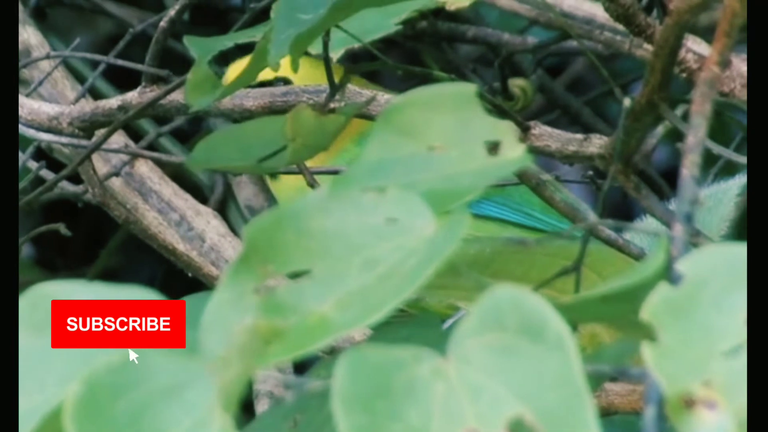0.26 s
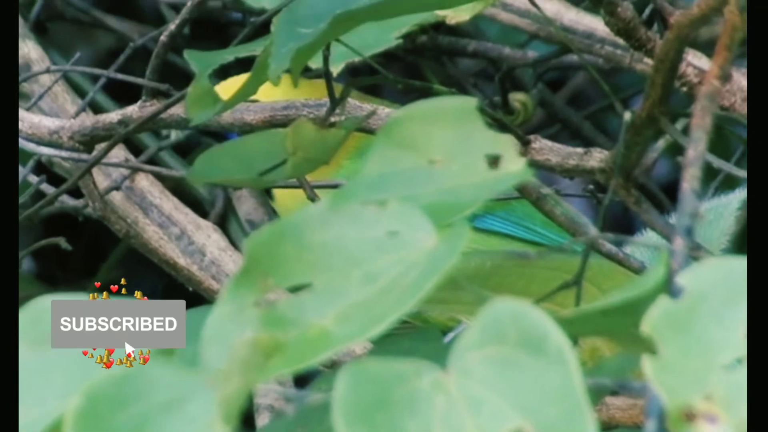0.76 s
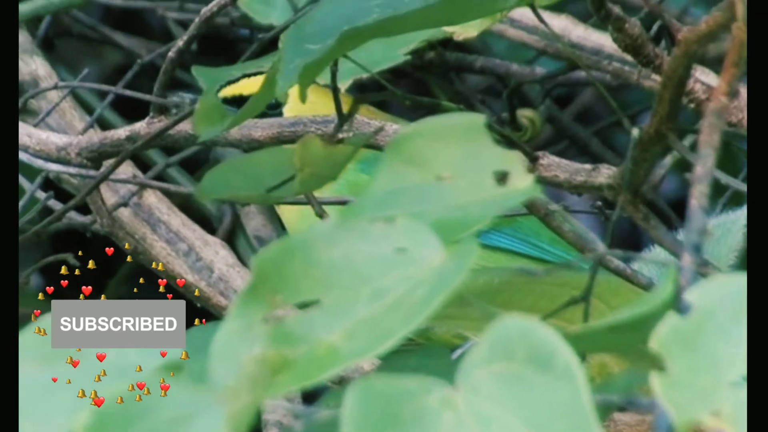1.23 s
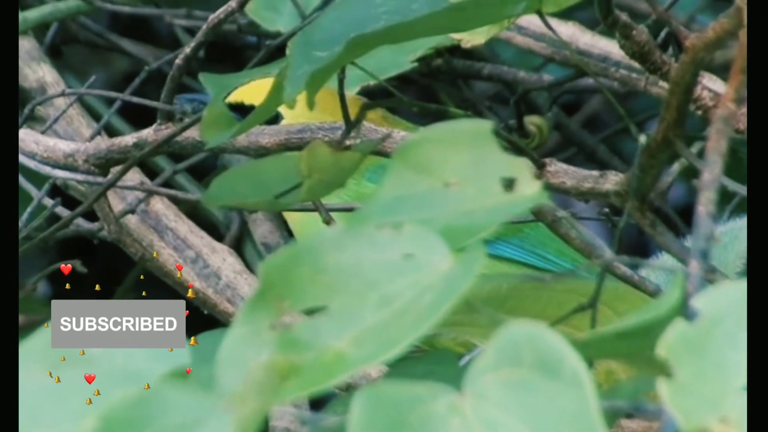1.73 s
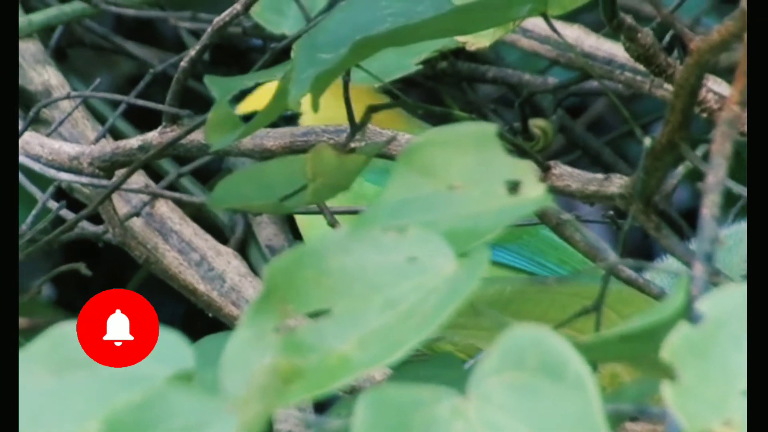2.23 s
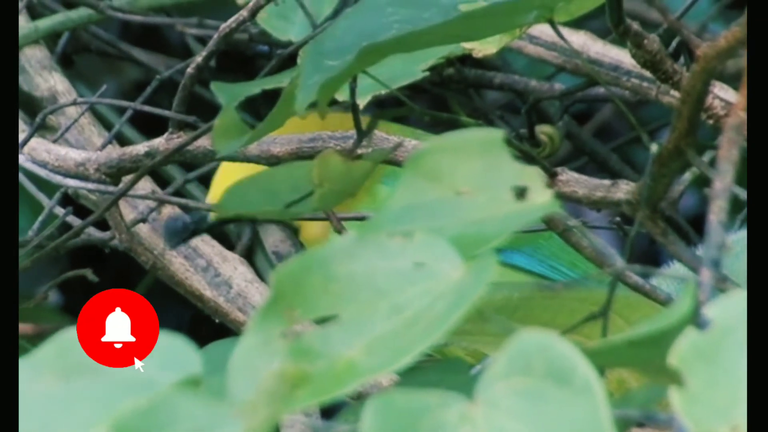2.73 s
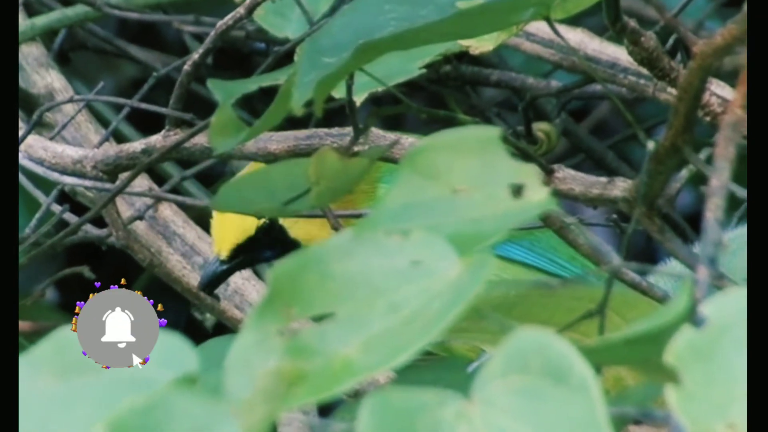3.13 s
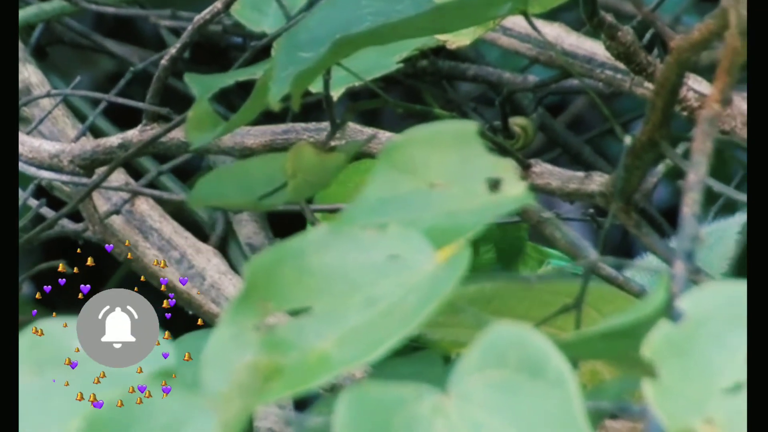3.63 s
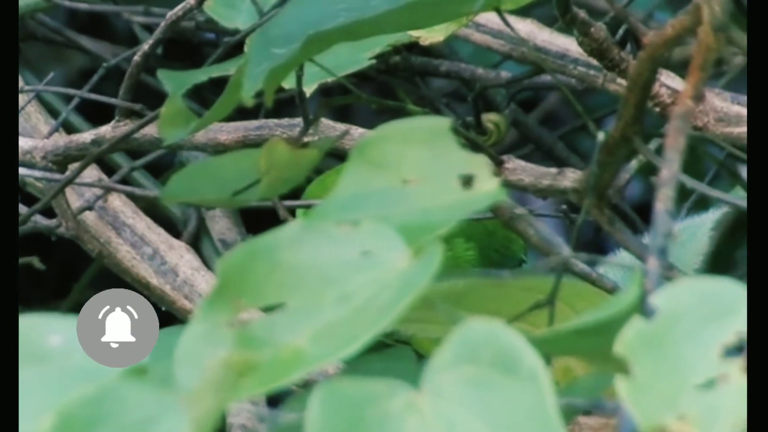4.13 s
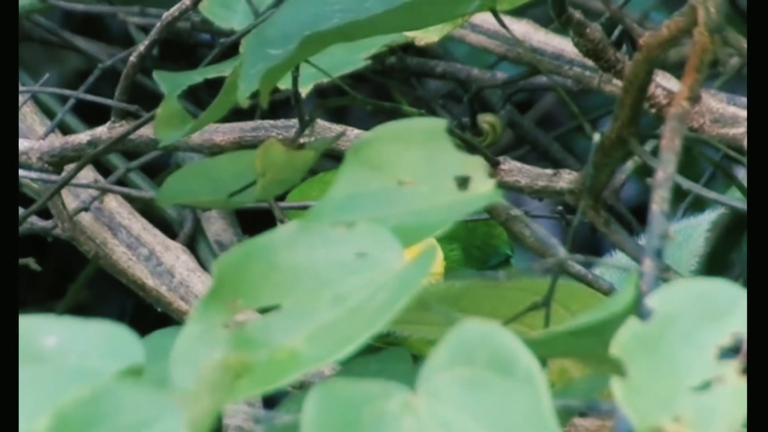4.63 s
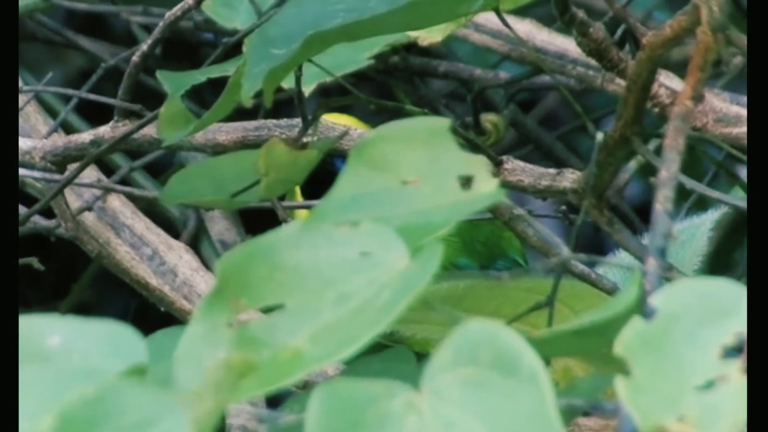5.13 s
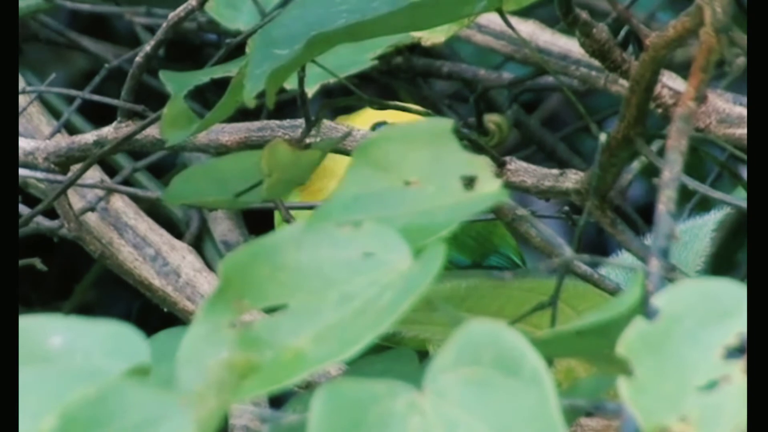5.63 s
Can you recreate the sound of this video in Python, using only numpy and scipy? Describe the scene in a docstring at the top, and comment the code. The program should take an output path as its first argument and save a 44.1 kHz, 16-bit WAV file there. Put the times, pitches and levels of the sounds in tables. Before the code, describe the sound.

Constant high insect trilling and ticking surrounds a near, crisp bird song. Short whistled chirps start hoarse and flick upward; fluttering rasps answer them. Song bursts are separated by gaps where distant birds pipe softly, wings brush leaves and a cicada swells. Close outdoor pickup, slight leafy scatter, low breeze, no strong echo.

```python
"""Insects drone all around, and at once a leafbird sings over them with both sides of its syrinx.
Gliding harmonic tones make its quick upward chirps and thin slurs; fluttering tone pairs make its rasps.
Decaying noise scatters the song among leaves; shaped noise puffs are its rustles and wing flicks.
A cicada is a resonant comb of lines, other insects pulsed noise bands or a trilled tone, far birds
level or gliding noise bands. The air is a faint noise rumble and hush with thin steady tones."""
import sys
import numpy as np
from scipy import signal
from scipy.fft import rfft, irfft, next_fast_len
from scipy.io import wavfile
from scipy.ndimage import map_coordinates

SR = 44100
rng = np.random.default_rng(int(sys.argv[2]) if len(sys.argv) > 2 else 0)


def unload_wav(signal):
    """Save mono or channel-first audio to the path in sys.argv[1] as 16-bit WAV at rate SR, clipped to [-1, 1]."""
    wavfile.write(
        sys.argv[1],
        SR,
        np.round(np.clip(np.atleast_2d(signal).T, -1, 1) * 32767).astype(np.int16),
    )


N = 259308

# Throat resonance shared by whistles and hoarse tones. Each row: frequency in Hz, gain in dB.
THROAT_GAIN = [(500, 8), (1000, -38.5), (1500, -11.5), (2200, -3), (4200, 0.5), (5500, -11), (6600, -16.5),
               (9500, -13), (11500, 6), (15000, -39)]


def amp(db):
    """Level law: 20 dB is a factor of ten in amplitude."""
    return 10 ** (np.asarray(db) / 20)


def unit(x):
    """Normalization to unit root-mean-square amplitude."""
    return x / np.sqrt(np.mean(x ** 2) + 1e-20)


def along(points, hz):
    """Interpolation of (Hz, value) points over logarithmic frequency."""
    f, v = np.transpose(points)
    return np.interp(np.log(np.abs(hz) + 1), np.log(f + 1), v)


def curves(rows, t):
    """Linear interpolation in time: each column after the first, read at t."""
    s, *cols = np.transpose(rows)
    return [np.interp(t, s, c) for c in cols]


def wobble(rate, size):
    """Band-limited fluctuation: a smooth random curve with rate knots a second."""
    knots = rng.standard_normal(int(size * rate / SR) + 4)
    return map_coordinates(knots, [np.arange(size) * rate / SR])


def turn(hz):
    """Phase in radians as the running integral of a moving frequency."""
    return 2 * np.pi * np.cumsum(hz) / SR


def filtered(x, gain):
    """Linear filtering: the spectrum of x multiplied by a gain of frequency."""
    m = next_fast_len(len(x) + 2048)
    return irfft(rfft(x, m) * gain(np.fft.rfftfreq(m, 1 / SR)), m)[:len(x)]


def noise(gain, size):
    """Spectral shaping: white noise through a gain of frequency, brought to rms 1."""
    return unit(filtered(rng.standard_normal(size), gain))


def band(hz, width, size):
    """Resonance: noise confined to one steep-sided peak."""
    return noise(lambda f: 1 / (1 + ((f - hz) / width) ** 2) ** 2.29, size)


def gate(t, length, attack, release):
    """Linear envelope: rise from time 0, hold, and fall to nothing at the given length."""
    return np.clip(t / attack, 0, 1) * np.clip((length - t) / release, 0, 1)


def add(out, s, x):
    """Superposition: mix x into out from time s, which may lie before the start."""
    start = round(s * SR)
    x, start = x[max(-start, 0):], max(start, 0)
    out[start:start + len(x)] += x[:len(out) - start]


def air():
    """Broadband noise shaped into low rumble and the hush of the bushes, with a faint whine of steady tones."""
    # Breeze. Each row: time in seconds, rumble level in dB, hush level in dB, both before the offsets below.
    breeze = [(0.0, -68.5, -66), (0.69, -67, -64), (1.01, -60, -59), (2.62, -64.5, -64), (3.0, -55, -61),
              (3.37, -64.5, -61), (3.57, -74.5, -69), (4.44, -65, -65.5), (5.88, -67.5, -69)]
    # Colour of the leaf noise. Each row: frequency in Hz, relative spectral gain in dB.
    leaf_colour = [(300, 0.5), (1000, -10.5), (2400, -13.5), (3200, 12.5), (5000, -1), (5800, -4.5),
                   (8000, 0), (10500, -19), (13500, 2.5), (15800, -16)]
    # Whine. Each row: mean pitch in Hz, mean peak level in dB.
    whine_tones = [(755, -73), (1345, -75), (1510, -71), (2025, -74), (2265, -66)]
    rumble_offset_db, hush_offset_db, leaves_offset_db = 6, -1, 13
    rumble_sway_db = 1.8
    hush_colour = [(60, -2.5), (250, 2.0), (600, -3), (2000, -9.0), (6000, -20.0)]  # (Hz, dB)
    t = np.arange(N) / SR
    rumble_db, hush_db = curves(breeze, t)
    rumble = amp(rumble_db + rumble_offset_db + rumble_sway_db * wobble(6.1, N)) * band(55, 95, N)
    hush = amp(hush_db + hush_offset_db) * noise(lambda f: amp(along(hush_colour, f)), N)
    leaves = amp(hush_db + leaves_offset_db) * noise(lambda f: amp(along(leaf_colour, f)), N)
    whine = sum(amp(db + 2 * wobble(3.23, N)) * np.sin(turn(hz + 3 * wobble(6.4, N)))
                for hz, db in whine_tones)
    return rumble + hush + leaves + whine


def insects(trill_rate=31, trill_db=3, tooth_hz=490, tooth_db=-11):
    """Amplitude modulation: a tone trills in bouts, and choruses pulse in groups of quick ticks."""
    # Choruses. Each row: centre in Hz, width scale in Hz, mean level in dB, pulses a second,
    # pulse depth in dB, tick depth in dB (a negative depth inverts the ticks).
    choruses = [(3302, 320, -51, 12, 5.5, -3.3), (4705, 1100, -67.5, 31, 14, 4.5),
                (6953, 310, -48.5, 19, 4.5, 3.5), (7030, 870, -52, 27, 5.5, -11.5),
                (14900, 380, -60.5, 19, 2.5, 3.5), (15270, 420, -75, 19, 13.5, 7.5)]
    # Trill bouts. Each row: start in seconds, end in seconds, level in dB before a 6.5 dB cut.
    trill_bouts = [(1.275, 3.432, -39.5), (4.74, 5.997, -43.5)]
    trill_hz, trill_idle_db, trill_fade_s = 4690, -51, 0.11
    ticks_per_pulse = 4
    t = np.arange(N) / SR
    level = amp(trill_idle_db) + sum(amp(db - 6.5) * gate(t - start, end - start, trill_fade_s, trill_fade_s)
                                     for start, end, db in trill_bouts)
    beat = np.sin(turn(trill_rate + 5 * wobble(6.4, N)))
    teeth = 1 + amp(tooth_db) * np.sin(turn(tooth_hz + 25 * wobble(85, N)))
    beating = amp(trill_db * beat + 4 * wobble(30, N))
    carrier = np.sin(turn(trill_hz + 26 * wobble(170, N)))
    out = level * unit(teeth * beating * carrier)
    for centre_hz, width_hz, level_db, rate, depth_db, tick_db in choruses:
        phase = turn(rate * (1 + 0.033 * wobble(9.2, N)))
        pulse_db = depth_db * np.sin(phase) + tick_db * np.sin(ticks_per_pulse * phase)
        pulses = amp(pulse_db + .5 * wobble(0.2, N))
        out += amp(level_db) * unit(pulses * band(centre_hz, width_hz, N))
    return out


def crickets(width_hz=45, pause_db=-11):
    """Frequency shifting: very high narrow bands sag in pitch through phrases parted by brief dips."""
    # Bush cricket bouts. Each row: start in seconds, length in seconds (sounding for 3 at most),
    # first pitch in Hz, level in dB before a 3.5 dB lift.
    bouts = [(-.05, 0.75, 12750, -53.5), (0.648, 4.3, 12970, -58.5), (0.693, 4.4, 12540, -63),
             (0.944, .7, 12700, -51), (1.753, 0.96, 12780, -55.5), (2.754, 1.3, 12640, -64),
             (3, 0.6, 13100, -61), (4.12, 5.4, 12550, -64), (4.243, 1.64, 13000, -57.5)]
    sag_hz_per_s, phrases_per_s = 120, 3.6
    t = np.arange(3 * SR) / SR
    out = np.zeros(N)
    for s, length, hz, db in bouts:
        tone = (signal.hilbert(band(hz, width_hz, len(t))) * np.exp(-1j * turn(sag_hz_per_s * t))).real
        pause = np.cos(turn(phrases_per_s * (1 + .15 * wobble(3, len(t)))) / 2) ** 6
        add(out, s, amp(db + 3.5 + pause_db * pause) * gate(t, length, .03, .04) * tone)
    return out


def cicada(click_hz=129.4, width_hz=135):
    """Source and resonance: fast clicks imply a comb of lines, and a shifting resonance picks out a few."""
    # One phrase. Each row: time in seconds from its loudest moment, resonance in Hz, level in dB.
    phrase = [(-.2, 4340, -64), (0, 4340, -38), (.5, 4460, -45.5), (.76, 5000, -45), (.96, 4580, -41.5),
              (1.2, 4670, -40), (1.42, 4650, -49.5), (1.8, 4800, -69.5)]
    # Loudest moment of each phrase, in seconds.
    phrase_times = [-.05, 3.39]
    out = np.zeros(N)
    t = np.arange(phrase[0][0], phrase[-1][0], 1 / SR)
    centre_hz, db = curves(phrase, t)
    lines = range(32, 42)  # harmonic numbers of the click rate
    weights = [1 / (1 + ((k * click_hz - centre_hz) / width_hz) ** 2) for k in lines]
    for s in phrase_times:
        phase = turn(click_hz + 0.11 * wobble(15, len(t)))
        comb = sum(w * np.sin(k * phase + 2 * np.pi * rng.random()) for k, w in zip(lines, weights))
        add(out, s + t[0], amp(db) * unit(comb))
    return out


def far_birds(fade=0.62):
    """Diffusion by trees: distant calls, the lowest level and the others rising, blur into lingering bands."""
    # Far calls. Each row: start in seconds, level in dB, held pitch in Hz, seconds before the fade begins.
    calls = [(.76, -34, 4005, 0.14), (.932, -47.5, 8130, 0.062), (1.049, -39, 3463, 0.14),
             (1.338, -34.5, 4020, 0.13), (1.931, -38, 3930, 0.16), (2.782, -40, 3510, .13),
             (3.123, -34.5, 4050, 0.092), (4.275, -38, 4020, 0.084), (4.362, -52.5, 8300, 0.09),
             (4.531, -44, 3415, 0.11), (4.848, -36.5, 4090, 0.072), (5.431, -39.5, 3970, 0.067)]
    lowest_hz, largest_rise_hz = 3530, 451.6  # these limit the rise; calls held below lowest_hz stay level
    out = np.zeros(N)
    t = np.arange(SR * 3 // 4) / SR
    for s, db, held_hz, length in calls:
        rise_hz = np.clip(held_hz - lowest_hz, 0, largest_rise_hz)
        glide = np.exp(1j * turn(-rise_hz * np.exp(-t / 0.1)))
        call = signal.hilbert(band(held_hz, 200 + 0.82 * rise_hz, len(t))) * glide
        # the fade loses 60 dB in fade seconds
        swell = (1 - np.exp(-t / 0.02)) * amp(db - 60 * np.maximum(t - length, 0) / fade)
        add(out, s, swell * call.real)
    return out


def flicks(brush_db=-12):
    """Turbulence: feathers push air and brush leaves in soft, low puffs of decaying noise."""
    # Wing flicks and leaf brushes. Each row: start in seconds, level in dB, centre in Hz,
    # width scale in Hz, time to decay by 60 dB in seconds.
    puffs = [(1.007, -42, 890, 480, 0.32), (1.101, -49, 1000, 480, 0.33), (1.161, -50.5, 870, 430, 0.26),
             (1.214, -47.5, 796, 300, 0.15), (2.265, -42.5, 875, 400, 0.13), (2.59, -52, 666, 250, 0.03),
             (3.381, -32.5, 717, 296, 0.031)]
    out = np.zeros(N)
    t = np.arange(SR // 3) / SR
    for s, db, hz, width_hz, decay in puffs:
        puff = band(hz, width_hz, len(t)) + amp(brush_db) * band(1300, 1700, len(t))
        add(out, s, amp(db - 60 * np.maximum(t - .008, 0) / decay) * np.minimum(t / 0.0027, 1) * puff)
    return out


def syrinx(hz, second_db, third_db, flicker_db=4):
    """Source and filter: a tone with unsteady overtones, each weighted by the throat resonance."""
    phase = turn(hz)

    def partial(k):
        """Harmonic series: the k-th multiple of the pitch."""
        return np.sqrt(2) * amp(along(THROAT_GAIN, k * hz)) * np.sin(k * phase)

    overtones = sum(amp(db + flicker_db * np.tanh(wobble(235, len(hz)))) * partial(k)
                    for k, db in enumerate([second_db, third_db], 2))
    return partial(1) + overtones


def slurs(flutter_hz=158, unevenness=0.41):
    """Frequency modulation: high whistles glide from the second side of the syrinx, the last one warbled."""
    # Three glides. Each row: time in seconds, pitch in Hz, level in dB before a 3 dB lift.
    arch = [(2.299, 3060, -26.5), (2.311, 4980, -11.5), (2.319, 5170, -8.5), (2.331, 4970, -17),
            (2.347, 4850, -27)]
    rise = [(2.334, 3246, -10), (2.343, 3210, -13), (2.352, 3530, -21.5), (2.376, 4500, -16),
            (2.395, 5070, -19.5)]
    dip = [(2.448, 2820, -27), (2.457, 4380, -20.5), (2.463, 4560, -16.5), (2.474, 3760, -21),
           (2.49, 3580, -18.5), (2.512, 4010, -25.5), (2.523, 4580, -16.5), (2.531, 4070, -18)]
    out = np.zeros(N)
    # with each glide: flutter depth in Hz at mid-length, overtone level in dB
    for glide, depth_hz, overtone_db in [(arch, 30, -20), (rise, 82, -15.5), (dip, 270, -24)]:
        t = np.arange(glide[0][0], glide[-1][0], 1 / SR)
        hz, db = curves(glide, t)
        flutter = np.sin(2 * np.pi * flutter_hz * (t - t[0])) + unevenness * np.tanh(wobble(900, len(t)))
        hz = hz + depth_hz * np.hanning(len(t)) ** .5 * flutter + 45 * wobble(730, len(t))
        soft_ends = signal.windows.tukey(len(t), .08)
        level = amp(db + 3.0 + 2.0 * wobble(300, len(t)))
        voice = syrinx(hz, second_db=overtone_db, third_db=overtone_db - 14)
        add(out, t[0], soft_ends * level * voice)
    return out


def rasps(flutter_hz=196, unsteady=.04, swing_hz=370, jitter_hz=210, shrill_hz=8100, overtone_db=-15):
    """Nonlinear mixing: two rising tones flutter together, and their square adds a rough crown of sum tones."""
    # Rasps. Each row: start of the rise in seconds, its length in seconds, first and last pitch of
    # the upper tone in Hz, level in dB, relative shrill resonance in dB.
    rasp_rows = [(0.09, 0.12, 3950, 6810, -18.5, -6.5), (0.275, 0.13, 4290, 6910, -18.5, -17.5),
                 (0.481, 0.13, 4540, 6370, -18, -19), (2.285, 0.035, 5540, 6170, -26, -6.5),
                 (3.525, 0.12, 4114, 6720, -18.5, -6), (3.71, 0.12, 4355, 6810, -18, -16),
                 (3.914, 0.13, 4465, 6465, -18, -18.5)]
    # Colour of the hiss, with a gap near 12.5 kHz. Each row: frequency in Hz, relative gain in dB.
    hiss_colour = [(2200, -36.5), (3100, -28), (4600, 0), (6400, -1), (7200, -9), (8200, -9), (10000, -5.5),
                   (11600, -6), (12500, -17), (13600, -2.5), (15800, -2.5)]
    lead_s, attack_s, release_s = .016, 0.025, 0.025  # the sound starts lead_s before the rise
    upper_start_db, handover = -25.5, 0.49  # the upper tone starts weak, full at this share of the length
    lower_fade_db, hiss_start_db, hiss_fade_db = -23, -6.5, -7  # fades over the whole rasp
    climb_bend = 0.92  # under 1: the climb is steepest at first
    out = np.zeros(N)
    for s, length, first_hz, last_hz, db, shrill_db in rasp_rows:
        t = np.arange(-lead_s, length + 0.0033, 1 / SR)
        size, rise = len(t), t / length
        upper_db = upper_start_db * np.maximum(1 - rise / handover, 0)
        lower_db, hiss_db = lower_fade_db * rise ** 2, hiss_start_db + hiss_fade_db * rise ** 3
        flutter = np.sin(turn(flutter_hz * (1 + unsteady * wobble(150, size))))
        jitter = lambda: jitter_hz * np.tanh(wobble(1100, size))
        climb = (last_hz - first_hz) * np.maximum(rise, 0) ** climb_bend
        steadying = 1 - 0.45 * rise ** 2  # the upper tone narrows as it nears its top
        upper = turn(first_hz + climb + steadying * (swing_hz * flutter + jitter()))
        lower = turn(0.91 * first_hz + 0.25 * climb * rise + swing_hz * flutter + jitter())
        pair = sum(amp(level - 2 + 4.45 * np.tanh(wobble(402.8, size))) * np.exp(1j * phase)
                   for level, phase in [(upper_db, upper), (lower_db, lower)])
        crown = amp(overtone_db) * pair ** 2 * np.exp(1j * turn(300 * wobble(2400, size)))
        hiss_level = amp(hiss_db + 1.6 * flutter + 0.93 * wobble(120, size))
        hiss = hiss_level * noise(lambda f: amp(along(hiss_colour, f)), size)
        shrill_level = amp(shrill_db + 4.0 * wobble(209, size)) * np.exp(-((rise - .21) / 0.28) ** 4)
        shrill = shrill_level * band(shrill_hz, 790, size)
        attack = np.minimum((t - t[0]) / attack_s, 1) ** 3
        release = np.minimum((t[-1] - t) / release_s, 1)
        voice = np.sqrt(2) * (pair + crown).real + hiss + shrill
        add(out, s + t[0], amp(db) * attack * release * voice)
    return out


def chirps(shake_db=5.0, scrape_db=-10, crackle_db=-17, hoarse_rough=0.67, sweep_rough=0.082,
           held_rough=0.018, knee=11, clear_db=-27, rich_db=33, third_db=-3, doubling_db=-7):
    """Period doubling: each chirp starts low and hoarse, and clears as it climbs to a held whistle."""
    # Chirps. Each row: mid-sweep time in seconds, sweep level in dB, hold level in dB,
    # held pitch in Hz, lead-in in seconds.
    chirp_rows = [(0.099, -11.5, -16, 3255, 0.033), (0.2916, -10, -10, 3153, 0.0084),
                  (0.4925, -10.5, -12, 3233, 0.015), (1.529, -13, -8.5, 3242, 0.011),
                  (1.7039, -12.5, -7.5, 3132, 0.035), (1.8927, -13.5, -7.5, 3170, 0.058),
                  (2.0972, -13.5, -8, 3216, 0.045), (2.3065, -15, -15.5, 3240, 0.048),
                  (2.5269, -17, -15, 3185, 0.027), (2.6227, -9.5, -12.5, 3220, 0.013),
                  (4.963, -14, -8.5, 3253, 0.013), (5.1396, -12.5, -7.5, 3118, 0.034),
                  (5.327, -13.5, -7, 3165, 0.054), (5.533, -13.5, -8, 3227, 0.046),
                  (5.7411, -16, -9, 3200, 0.073)]
    # Half-integer multiples of the pitch, from the doubled period.
    half_orders = [1.5, 2.5, 3.5]
    # the pitch grows by a fixed ratio until it meets the held note; times run from mid-sweep
    mid_sweep_hz, octaves_per_s, span_s = 2430, 27, .065
    voiced_s, onset_db_per_s = -0.038, 3199  # when the voice catches, and how fast
    full_voice_s, swell_db_per_s = -.014, 628.5  # when the onset reaches full voice, and how fast
    hold_s, hold_sag_db_per_s = 0.019, 291  # the held note slowly weakens
    release_s, release_db_per_s = 0.051, 3000
    clear_s, clearing_s = -0.023, 0.008  # when hoarseness turns into a whistle, and how gradually
    overshoot_hz, settle_s = 273, 0.015  # the shorter the lead-in, the further the pitch overshoots
    waver = .035  # pitch unsteadiness, scaled by the roughness
    out = np.zeros(N)
    t = np.arange(-span_s, span_s, 1 / SR)
    size = len(t)
    after = lambda s: np.maximum(t - s, 0)
    held = np.clip((t - .012) / .016, 0, 1)  # 0 in the sweep, 1 in the held whistle
    hoarse = 1 / (1 + np.exp((t - clear_s) / clearing_s))
    rough = hoarse_rough * hoarse + sweep_rough * (1 - held) + held_rough
    overtone_db = clear_db + rich_db * hoarse
    swell_db = -swell_db_per_s * np.maximum(full_voice_s - t, 0)
    level_db = swell_db - hold_sag_db_per_s * after(hold_s) - release_db_per_s * after(release_s)
    sweep = mid_sweep_hz * 2 ** (octaves_per_s * t)
    for s, sweep_db, hold_db, held_hz, lead in chirp_rows:
        overshoot = overshoot_hz * np.exp(-lead / settle_s) + 60
        hz = sweep / (1 + (sweep / held_hz) ** knee) ** (1 / knee)
        hz = hz + overshoot * np.exp(-((t - .023) / 0.0088) ** 2)
        hz = hz * (1 + waver * rough ** .5 * wobble(895.6, size))
        tone = syrinx(hz, second_db=overtone_db, third_db=overtone_db + third_db, flicker_db=-3)
        halfway = sum(amp(along(THROAT_GAIN, k * hz) + 2.6 * wobble(260, size)) * np.sin(k * turn(hz))
                      for k in half_orders)
        grain = band(3720, 2100, size) + amp(crackle_db) * band(10500, 3000, size)
        scrape = amp(scrape_db) * rough * grain
        onset = amp(-onset_db_per_s * np.maximum(voiced_s - t, 0))
        opening = np.clip((t + lead) / 0.046 + .5, .2, 1) * onset
        shake = amp(shake_db * (2 * rough) ** .5 * np.tanh(wobble(317.6, size)))
        voice = tone + amp(doubling_db) * hoarse * halfway + scrape
        level = amp(sweep_db + (hold_db - sweep_db) * held + level_db)
        add(out, s + t[0], level * opening * shake * voice)
    return out


def thicket(x, near_db=-18, tail_db=-25):
    """Scattering: nearby leaves answer the sound at once, and the bushes behind add a short tail."""
    # Reverberation of the bushes. Each row: frequency in Hz, time to decay by 60 dB in seconds.
    decay_times = [(300, 0.044), (3000, 0.31), (7000, 0.6), (14000, 0.047)]
    hz, t, z = signal.stft(rng.standard_normal(SR // 2), SR, nperseg=256)
    tail = signal.istft(z * amp(-60 * t / along(decay_times, hz)[:, None]), SR, nperseg=256)[1]
    age = np.arange(len(tail)) / SR
    near = rng.standard_normal(len(tail)) * amp(-60 * age / 0.16) * (age > .002)
    answer = amp(near_db) * near / np.linalg.norm(near) + amp(tail_db) * tail / np.linalg.norm(tail)
    return x + signal.fftconvolve(x, answer)[:N]


def scene():
    """Superposition: the near bird in its thicket, over the life around it."""
    # Overall tone colour of the song, dulled near 13 kHz. Each row: frequency in Hz, gain in dB.
    song_colour = [(2000, -0.5), (9000, 2.5), (11600, -5.5), (13000, -17.5), (15800, -10)]
    song = filtered(chirps() + rasps() + slurs(), lambda hz: amp(along(song_colour, hz)))
    surroundings = far_birds() + cicada() + insects() + crickets() + air()
    return (thicket(song + flicks()) + surroundings)[None]


def record(dry):
    """Band limiting: the recorder keeps nothing from its top frequency upward."""
    top_hz = 15850
    return filtered(dry[0], lambda hz: hz < top_hz)[None]


dry = scene()
out = record(dry)
unload_wav(out)
```